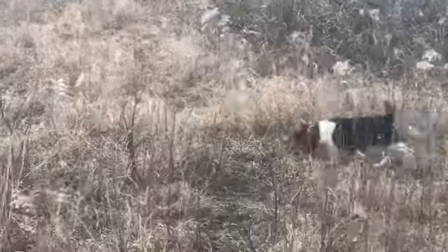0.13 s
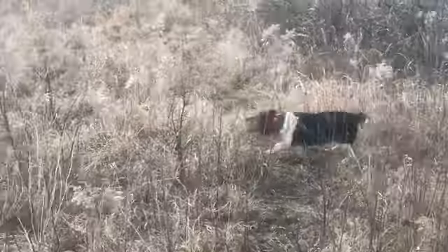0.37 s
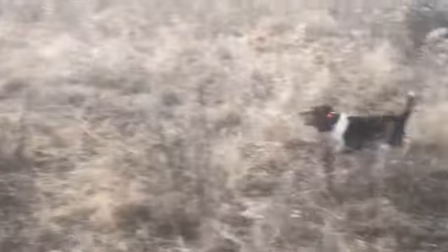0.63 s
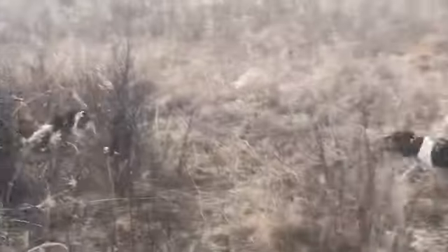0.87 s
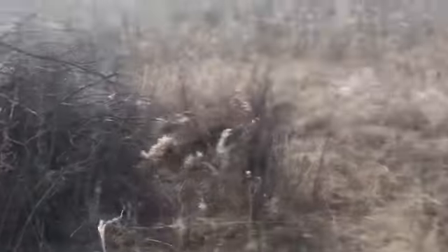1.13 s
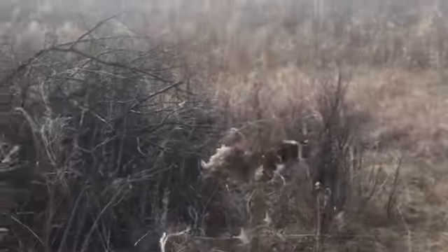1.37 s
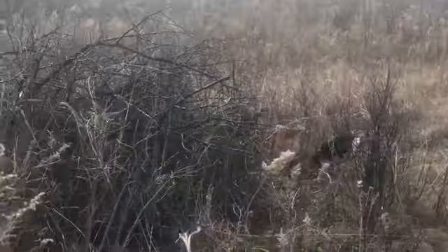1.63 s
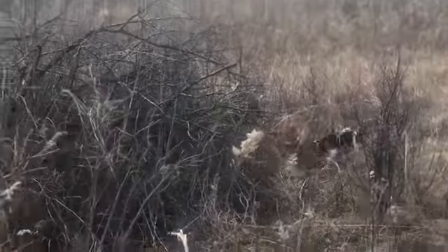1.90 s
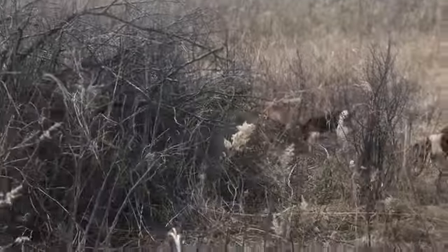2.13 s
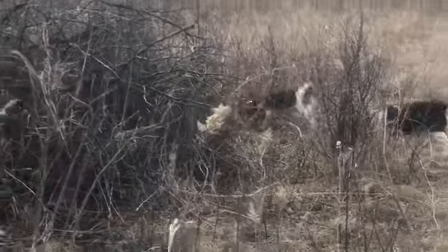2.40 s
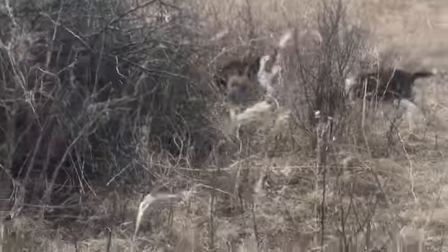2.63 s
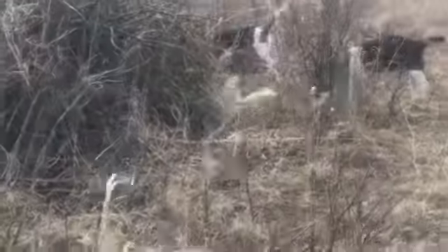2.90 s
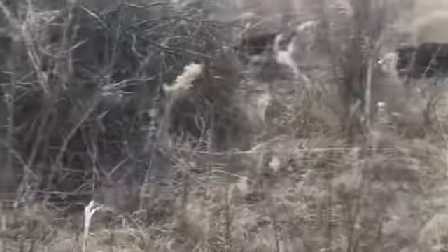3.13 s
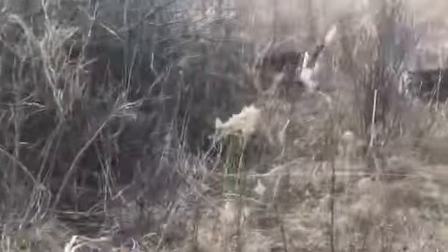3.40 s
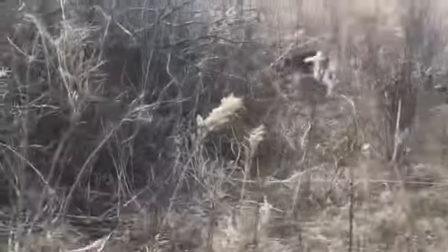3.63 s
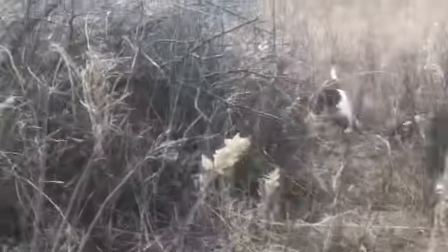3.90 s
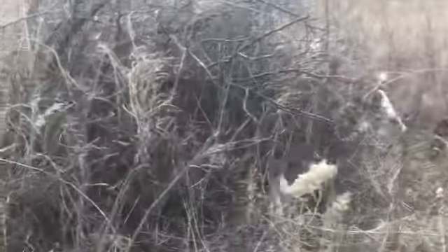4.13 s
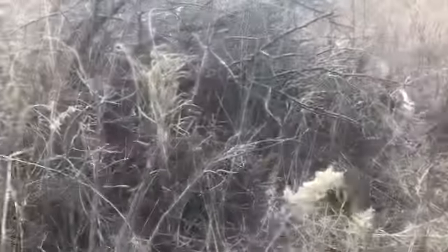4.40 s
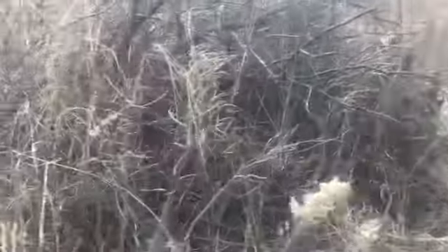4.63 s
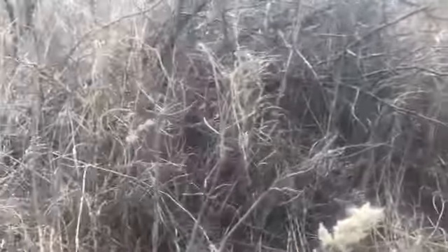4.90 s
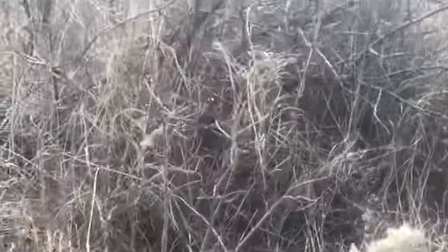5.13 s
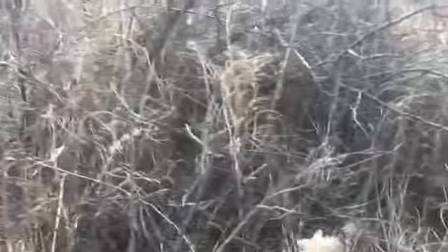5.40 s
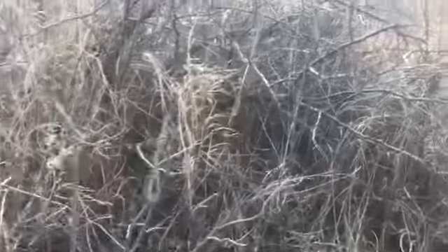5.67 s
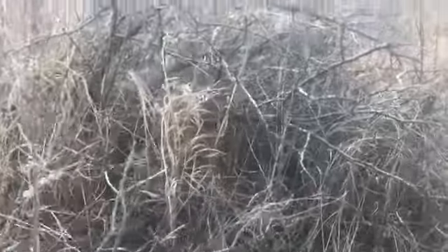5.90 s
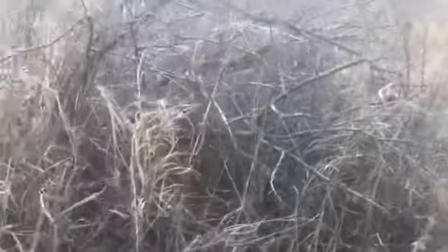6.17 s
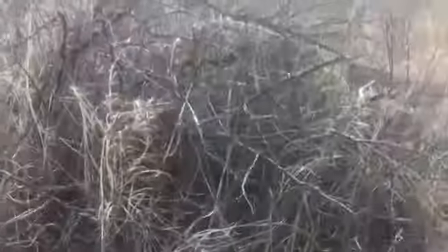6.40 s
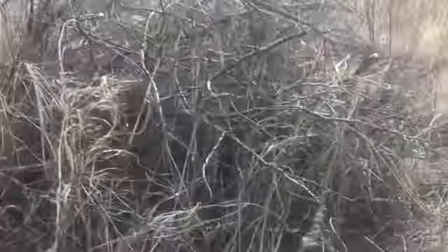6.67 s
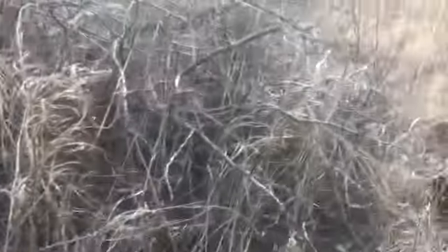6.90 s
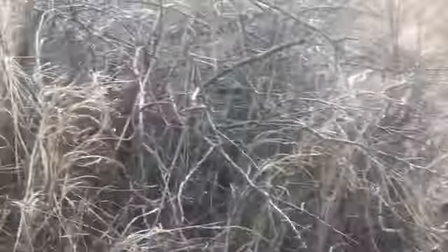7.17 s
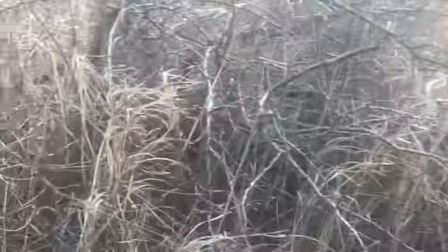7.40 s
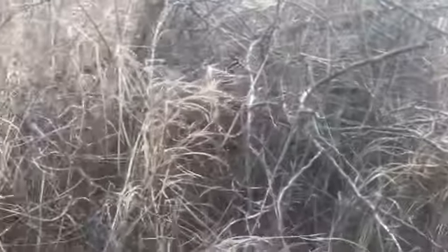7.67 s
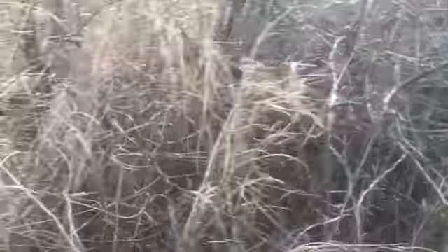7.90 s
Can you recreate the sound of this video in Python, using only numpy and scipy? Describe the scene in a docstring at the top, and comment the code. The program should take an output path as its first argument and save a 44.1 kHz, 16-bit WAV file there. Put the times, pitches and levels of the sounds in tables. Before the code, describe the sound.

Outdoors in dry scrub, a pack of hounds bays some metres from a handheld microphone. Heavy wind thuds bury the first half second, then fade to light rumble. Short overlapping yelps, some deeper, some hoarse or squeaky, continue throughout and get stronger after about three seconds. Near the end, gusts pop and rumble over the dogs again.

```python
"""A pack of hounds bays in dry scrub some metres off: overlapping calls near 500-700 Hz.
Each call is a stack of overtones on a gliding pitch, shaped by throat and mouth, with some breath noise.
Gusty wind, made of filtered noise, buffets the microphone in low lumps and pops.
A dry stem ticks once, and a steady microphone hiss steps up for a moment at four listed times."""
import sys
import numpy as np
from scipy import signal
from scipy.fft import rfft, irfft, next_fast_len
from scipy.io import wavfile
from scipy.ndimage import map_coordinates

SR = 44100
rng = np.random.default_rng(int(sys.argv[2]) if len(sys.argv) > 2 else 0)


def to_wav(s):
    """Save 16-bit WAV."""
    ch = np.atleast_2d(s).T  # columns
    pcm = np.round(np.clip(ch, -1, 1) * 32767)  # PCM
    wavfile.write(sys.argv[1], SR, pcm.astype(np.int16))


def attenuation_scalar(level_db):
    """Turn a level in dB into a linear amplitude multiplier (20 dB per decade)."""
    decades = np.asarray(level_db, float) / 20
    return 10 ** decades


N = 354475  # length of the scene in samples, about 8 s

# Colour of the microphone hiss: (frequency [Hz], relative level [dB])
HISS_COLOUR = [(300, -23), (600, 6), (1500, 2), (10000, -10.5), (15000, -16.5), (16500, -39.5)]
# Spans of louder hiss: (from [s], to [s])
LOUDER_HISS = [(0, .11), (.245, .39), (7.487, 7.546), (7.935, 8.04)]

# Wind between gusts: (time [s], strength [dB])
WIND_LULL = [(0, -31), (0.6, -31), (1.1, -38.5), (2.1, -44.5), (2.6, -41.5), (3.2, -40.5), (3.5, -51.5),
             (3.9, -45), (4.5, -54), (5.1, -46), (5.6, -49.5), (6.1, -37), (6.45, -33.5), (6.9, -52),
             (7.25, -45), (7.45, -29), (8.04, -24.5)]
# Gusts on top of the lull: (time of peak [s], strength [dB], time to swell or sink by 20 dB [s])
WIND_GUSTS = [(0.0, -9, .15), (0.269, -8.5, 0.1176), (0.72, -19, 0.1883), (1.35, -24, 0.0535),
              (1.82, -28, 0.13), (2.3, -28.5, 0.12), (2.54, -29, .1), (2.74, -34, .13), (3.7, -34, 0.16),
              (4.809, -40, .07), (5.59, -34.5, 0.08), (5.99, -29.5, 0.22), (6.82, -37, 0.2),
              (7.02, -41, 0.0254), (7.13, -36, 0.01), (7.31, -23.5, 0.0627), (7.6, -18, 0.26),
              (7.87, -19.5, 0.01), (8.03, -12.5, 0.23)]
# Sudden eddies on the microphone port: (start [s], strength [dB])
EDDIES = [(0.203, -18.5), (0.245, -9.5), (0.271, -6), (0.287, -13.5), (0.492, -22), (0.634, -24),
          (0.704, -18.5), (0.9, -21), (1.048, -24.5), (1.323, -21.5), (1.802, -28), (2.206, -30.5),
          (2.272, -30.5), (2.379, -26.5), (2.448, -32.5), (3.679, -32.5), (5.573, -33), (5.982, -24.5),
          (7.012, -33), (7.293, -12), (7.341, -12), (7.438, -17), (7.48, -19.5), (7.574, -17),
          (7.769, -22.5), (7.841, -19.5), (7.864, -11), (7.935, -11.5), (7.993, -8.5), (8.013, -8.5)]
# Colour of the low wind lumps: (frequency [Hz], relative level [dB])
RUMBLE_COLOUR = [(15, -43), (30, -15), (50, 4), (90, 2), (140, -4.5), (220, -18), (400, -40.5),
                 (1500, -110)]
# Colour of the flapping eddies: (frequency [Hz], relative level [dB])
FLAP_COLOUR = [(60, -24), (150, 8), (250, 1.5), (500, -12.5), (1000, -26), (3000, -110)]
# Colour of the crack in hard eddies: (frequency [Hz], relative level [dB])
CRACK_COLOUR = [(250, -17), (600, 5), (1200, -7.5), (2000, -24), (3200, -34.5), (7000, -110)]

# A dry stem ticks: (time [s], strength [dB])
TWIG_TICK = (3.258, -52)

# Resonances of a hound's throat: (frequency [Hz], relative gain [dB])
THROAT_GAIN = [(200, -12), (400, -6), (650, 4.5), (850, -7.5), (1150, -13.5), (1400, -17.5), (1800, -26.5),
               (2600, -33), (3200, -48), (3800, -66), (6500, -81.5)]
# Colour of air torn at the vocal folds: (frequency [Hz], relative level [dB])
BREATH_COLOUR = [(350, -38.5), (1000, 3), (2400, -14.5), (3500, -44), (4800, -31), (5800, -36),
                 (7000, -89.5)]
# Scrub between pack and microphone tilts the treble: (time [s], slope [dB per half octave])
SCRUB_TILT = [(0, 3.5), (2.4, 2), (3, -0.5), (5, -1), (5.5, 0.5), (6.2, -1), (8, -1)]

# Calls of a hound with wide low arches:
# (start [s], length [s], held note begins [Hz], held note ends [Hz], strength [dB])
DEEP_CALLS = [(0.790, 0.18, 470, 472.7, -44.5), (1.235, .16, 486, 486, -37.5),
              (1.545, .165, 472, 477.4, -39), (1.920, .17, 478, 478.5, -40), (3.075, 0.19, 498, 504, -35),
              (3.700, 0.1564, 499.4, 499, -36), (4.300, .19, 500, 503, -38), (6.605, .215, 532, 530, -30),
              (7.180, 0.18, 495, 494, -35)]
# Calls of a hound with higher, shorter arches:
# (start [s], length [s], held note begins [Hz], held note ends [Hz], strength [dB])
ARCH_CALLS = [(0.340, .2, 712, 728, -35), (0.695, .17, 690, 655, -38), (1.310, 0.18, 690, 672, -37),
              (2.845, 0.16, 692, 680, -34), (3.165, 0.15, 670, 690, -33), (3.450, .175, 670, 685, -34),
              (3.750, .207, 665, 685, -33), (4.395, .17, 657, 648, -32), (4.935, 0.1704, 688, 697, -33),
              (6.285, .13, 693, 685, -34), (6.590, .19, 680, 640, -34), (7.205, .13, 680, 705, -34),
              (7.550, .17, 560, 560, -36)]
# Calls of a hound holding level, mostly sinking notes:
# (start [s], length [s], held note begins [Hz], held note ends [Hz], strength [dB])
FLAT_CALLS = [(0.320, 0.064, 575, 570, -37), (0.930, 0.1863, 598, 558, -36), (1.335, .235, 562, 538, -40),
              (1.840, 0.15, 578, 548, -33), (2.255, 0.1112, 594, 567, -42), (4.270, 0.18, 592, 538, -33),
              (5.095, 0.1497, 575, 547, -35), (5.500, 0.13, 700, 640, -33), (5.670, 0.2, 578, 542, -35),
              (6.125, .145, 550, 570, -32), (6.360, 0.14, 548, 545, -36), (6.820, .12, 575, 588, -30),
              (6.930, 0.057, 540, 585, -45), (7.075, 0.12, 563, 548, -33), (7.670, 0.12, 502, 480, -38),
              (7.770, 0.054, 555, 540, -40)]
# Calls of a loud hound with a strong fundamental and patches of half-way lines:
# (start [s], length [s], held note begins [Hz], held note ends [Hz], strength [dB])
NEAR_CALLS = [(0.000, .11, 634, 630, -32), (1.110, 0.0445, 639.9, 640, -38), (1.550, 0.063, 660, 645, -35),
              (1.970, 0.0537, 594, 595, -37), (2.345, 0.094, 612, 600, -33), (4.147, 0.12, 634, 644, -28.5),
              (4.445, 0.09, 625, 622, -34), (4.550, .155, 636, 624, -28), (4.700, 0.1168, 615, 625, -38),
              (5.475, .055, 595, 620, -40), (5.705, 0.11, 642, 590, -29), (5.795, .1, 600, 630, -28),
              (6.180, .12, 650, 630, -31), (6.740, 0.23, 625.3, 622, -29), (7.185, .13, 622, 620, -30),
              (7.305, 0.12, 640, 618, -31)]
# Torn, chaotic calls:
# (start [s], length [s], held note begins [Hz], held note ends [Hz], strength [dB])
HOARSE_CALLS = [(0.380, 0.1, 630, 612, -32), (3.712, .168, 620, 650, -27), (5.245, .13, 655, 685, -30),
                (5.320, 0.14, 630, 628, -31), (6.355, .055, 560, 560, -34), (7.553, .06, 520, 550, -36)]
# Short high breaks, some of them on top of hoarse calls:
# (start [s], length [s], held note begins [Hz], held note ends [Hz], strength [dB])
SQUEAL_CALLS = [(3.712, 0.0572, 748, 756, -30), (5.370, 0.074, 780.5, 778, -46),
                (5.760, 0.05, 768, 762, -32), (6.800, 0.0625, 770, 785, -28)]

# Habits: the voice slides up and swells, holds, then slides down and dies. Each habit holds four parts:
#   (rise [s], starts under by [share of pitch], starts under by [dB], power of the slide),
#   (fall [s], ends under by [share of pitch], ends under by [dB], power of the slide),
#   brightness [dB per half octave],
#   mouth turning to or from the microphone: (time [s], lift of the upper overtones [dB])
# Habit of the deep hound: (rise part, fall part, brightness [dB per half octave], mouth part)
DEEP_WAY = (.09, .39, 1.5, 2.3), (.08, .5, 12, 2.3), -6, [(1, 3), (4.3, 4), (6.6, 1.5), (7.2, 8)]
# Habit of the arching hound: (rise part, fall part, brightness [dB per half octave], mouth part)
ARCH_WAY = (.058, .27, 14, 1.6), (.045, .28, 24, 2.3), -1.5, [(0.3, 11), (3.5, 11), (4.4, 0.5), (5, 3),
            (7.2, 7), (7.55, 10)]
# Habit of the level hound: (rise part, fall part, brightness [dB per half octave], mouth part)
FLAT_WAY = (.036, .11, 17, 1.8), (.03, .05, 13, 2.2), -.4, [(0.3, 11), (1, 6), (1.85, 1), (2.25, 10),
            (5.1, 14), (5.5, 2), (5.67, 11), (7.1, 14), (7.7, 5)]
# Habit of the loud hound: (rise part, fall part, brightness [dB per half octave], mouth part)
NEAR_WAY = (.02, .025, 3, 1.8), (.03, .06, 14, 2.2), -1.2, [(0, -11), (1.55, -2), (2, -10), (4.2, 0.5),
            (6.2, 8), (6.75, -5), (7.19, -3), (7.3, 6)]
# Habit of the hoarse calls: (rise part, fall part, brightness [dB per half octave], mouth part)
HOARSE_WAY = (.035, .13, 20, 1.8), (.05, .15, 18, 2.2), -2.5, [(0.4, -6), (3.7, 8), (5.25, 3), (5.32, 8)]
# Habit of the high breaks: (rise part, fall part, brightness [dB per half octave], mouth part)
SQUEAL_WAY = (.018, 0.011, 20, 1.8), (0.032, .03, 12, 2.2), 2.2, [(3.7, -15), (5.76, 3), (6.8, -11)]


def unit(x):
    """Scale to rms 1."""
    return x / np.sqrt(np.mean(x ** 2) + 1e-20)


def along(points, hz):
    """Read a value between (frequency, value) points on a log frequency axis."""
    f, v = np.transpose(points)
    return np.interp(np.log(hz + 1), np.log(f + 1), v)


def wobble(rate, size=N):
    """A smooth random curve through `rate` random knots a second."""
    knots = rng.standard_normal(int(size * rate / SR) + 4)
    return map_coordinates(knots, [np.arange(size) * rate / SR])


def coloured(x, spectrum):
    """Filter x to a spectrum, scaled so that white noise of rms 1 would stay near rms 1."""
    m = next_fast_len(N + 8192)
    gain = unit(attenuation_scalar(along(spectrum, np.fft.rfftfreq(m, 1 / SR))))
    return irfft(rfft(x, m) * gain, m)[:N]


def noise(spectrum):
    """Coloured noise of rms 1."""
    return unit(coloured(rng.standard_normal(N), spectrum))


def hiss():
    """Microphone hiss: coloured noise, 12 dB louder in the listed spans."""
    t = np.arange(N) / SR
    louder = sum((t >= a) & (t < b) for a, b in LOUDER_HISS)
    return attenuation_scalar(-73.5 + 12 * louder) * noise(HISS_COLOUR)


def gusting():
    """Wind strength: the lull with each gust swelling out of it and sinking back."""
    t = np.arange(N) / SR
    lull = attenuation_scalar(np.interp(t, *np.transpose(WIND_LULL)))
    return lull + sum(attenuation_scalar(db - 20 * np.abs(t - s) / span) for s, db, span in WIND_GUSTS)


def puffs(kicks, t60):
    """Each kick of an eddy swells fast, then dies by 60 dB in about t60 seconds."""
    t = np.arange(SR // 8) / SR
    puff = (1 - np.exp(-t / 0.0017)) * attenuation_scalar(-60 * t / t60)
    return np.abs(signal.fftconvolve(kicks, puff)[:N])


def wind():
    """Low lumps follow the gusts; eddies flap on the port in short puffs, and mostly the hard ones crack."""
    kicks = np.zeros(N)
    places = [min(round(at * SR), N - 1) for at, _ in EDDIES]
    kicks[places] = attenuation_scalar([db for _, db in EDDIES])
    gust = gusting()
    # lesser eddies between, about 45 a second, of random strength
    small = gust * (rng.random(N) < 45 / SR) * attenuation_scalar(-11.5 + 5.1 * rng.standard_normal(N))
    kicks = kicks + small

    low_level = gust * attenuation_scalar(-3 + 3 * wobble(18) + 2 * wobble(7)) + attenuation_scalar(-9.0) * puffs(kicks, t60=0.069)
    low = coloured(low_level * rng.standard_normal(N), RUMBLE_COLOUR)
    flap_level = attenuation_scalar(-26 + 2.4 * wobble(11)) * gust + attenuation_scalar(-0.5) * puffs(kicks, t60=0.06816)
    flap = coloured(flap_level * rng.standard_normal(N), FLAP_COLOUR)
    # the power weakens soft puffs more than hard ones
    crack_level = attenuation_scalar(-7) * puffs(kicks, t60=0.054) ** 1.515
    crack = coloured(crack_level * rng.standard_normal(N), CRACK_COLOUR)
    return low + flap + crack


def twig():
    """A dry stem gives a thin, bright tick: noise that dies within a few milliseconds."""
    at, db = TWIG_TICK
    since = np.arange(N) / SR - at
    tick = (since > 0) * attenuation_scalar(db - 60 * np.abs(since) / 0.0087) * rng.standard_normal(N)
    return coloured(tick, [(2500, -60), (5000, 1), (16000, -26.5)])


def scrub(x):
    """Bushes and ground scatter the sound into a short tail of fading noise, starting after 6 ms."""
    t = np.arange(SR // 2) / SR
    tail = rng.standard_normal(len(t)) * attenuation_scalar(-60 * t / .25) * (t > .006)
    return signal.fftconvolve(x, tail / np.linalg.norm(tail))[:N]


def hound(calls, habit, closing_db, rasp_db, half_db):
    """Overtones of the gliding pitch through throat and mouth; rasp shakes pitch and size of each cycle."""
    settle_s = .1  # the held note drifts ever slower
    even = 0.34  # 1 = loudness ignores the throat, 0 = it swells as overtones cross the resonance
    slack_db = 8  # per half octave: slack folds in the slides give a duller voice
    edge = round(0.0088 * SR)  # fade at both ends, in samples; each call is longer by one edge
    out, air = np.zeros(N + SR), np.zeros(N + SR)
    (rise_s, rise, rise_db, rise_bend), (fall_s, fall, fall_db, fall_bend), bright_db, facing = habit
    for s, length, begin_hz, end_hz, db in calls:
        start = round(s * SR)
        size = round(length * SR) + edge
        t = np.arange(size) / SR

        # the pitch slides up, drifts from one held note to the other, and slides down
        early = np.clip(1 - t / rise_s, 0, 1) ** rise_bend
        late = np.clip(1 - (length - t) / fall_s, 0, 1) ** fall_bend
        drift = 1 - np.exp(-np.maximum(t - rise_s, 0) / settle_s)
        held = begin_hz + (end_hz - begin_hz) * drift / drift[-1]
        pitch = held * (1 - rise * early - fall * late)

        # the folds slip most as they start and stop
        ends = np.exp(-t / 0.016) + np.exp((t - t[-1]) / 0.015)
        rasp = np.minimum(attenuation_scalar(rasp_db + 10 * ends + 3.5 * wobble(25, size)), .2)
        slow_shake = (0.006 + .1 * rasp) * wobble(22, size) + 0.0022 * wobble(60, size)
        fast_shake = 0.13 * rasp * wobble(200, size)
        pitch = pitch * (1 + slow_shake + fast_shake)

        # overtones, and half-way lines between them
        k = np.arange(1, 21)[:, None] / 2
        partial = k * pitch
        # an open mouth lifts all above the first resonance; a negative value lowers it
        open_db = np.interp(s, *np.transpose(facing))
        mouth = open_db * np.clip(np.log2(partial / 720) / 0.67, 0, 1)
        # the top dulls as the jaws close; a negative closing_db brightens it instead
        tilt = bright_db + np.interp(s, *np.transpose(SCRUB_TILT))
        tilt = tilt - closing_db * t / t[-1] - slack_db * (early + late)
        top = tilt * np.log2(np.maximum(partial, 1450) / 1450) / .5
        # alternate cycles differ now and then, which brings out the half-way lines
        half = np.where(k % 1, half_db + 9 * wobble(25, size) - 16 * (k < 1), 0)
        shimmer = 1.7 * np.array([wobble(20, size) for _ in k]) * np.clip(k - 1, 0, 3)
        gain = attenuation_scalar(along(THROAT_GAIN, partial) + mouth + top + half + shimmer)
        gain = gain / np.sqrt(np.sum(gain ** 2, axis=0) / 2) ** even

        turns = k * np.cumsum(pitch) / SR + rng.random(k.shape)
        voice = np.sum(gain * np.sin(2 * np.pi * turns), axis=0)
        voice = voice * (1 + rasp * wobble(500, size))
        fade = np.clip(np.minimum(t, t[::-1]) * SR / edge, 0, 1)
        level = fade * attenuation_scalar(db - rise_db * early - fall_db * late + 1.8 * wobble(40, size))
        out[start:start + size] += voice * level
        air[start:start + size] += rasp * level
    breath = coloured(attenuation_scalar(-5.0) * air[:N] * rng.standard_normal(N), BREATH_COLOUR)
    return out[:N] + breath


def scene():
    """Mix the hounds, their faint scatter, the wind and a twig."""
    pack = hound(DEEP_CALLS, DEEP_WAY, closing_db=-0.5, rasp_db=-31, half_db=-41.5)
    pack = pack + hound(ARCH_CALLS, ARCH_WAY, closing_db=11, rasp_db=-30, half_db=-43)
    pack = pack + hound(FLAT_CALLS, FLAT_WAY, closing_db=9.5, rasp_db=-28.5, half_db=-40)
    pack = pack + hound(NEAR_CALLS, NEAR_WAY, closing_db=1.5, rasp_db=-30, half_db=-21)
    pack = pack + hound(HOARSE_CALLS, HOARSE_WAY, closing_db=-3, rasp_db=-19, half_db=-8)
    pack = pack + hound(SQUEAL_CALLS, SQUEAL_WAY, closing_db=-1.0, rasp_db=-25, half_db=-23.5)
    scatter = attenuation_scalar(-27) * scrub(pack)
    return (pack + scatter + wind() + twig())[None]


def band_limit(x):
    """A steep low-pass at the top of the band."""
    return signal.sosfilt(signal.butter(12, 15750, fs=SR, output="sos"), x)


def record(dry):
    """Add the microphone hiss, then round off the loudest peaks under a soft ceiling."""
    x = dry + hiss()
    x = x / (1 + np.abs(x / .92) ** 8) ** (1 / 8)
    return band_limit(x)


dry = scene()
out = record(dry)
to_wav(out)
```